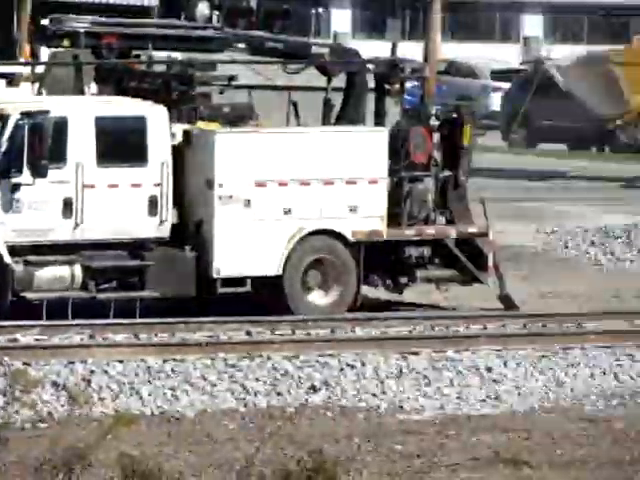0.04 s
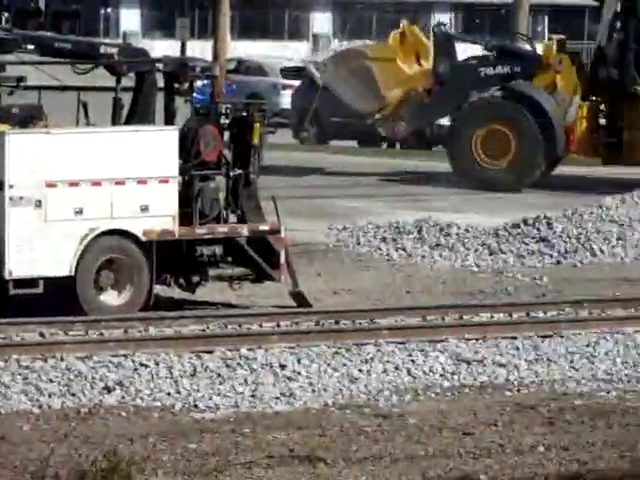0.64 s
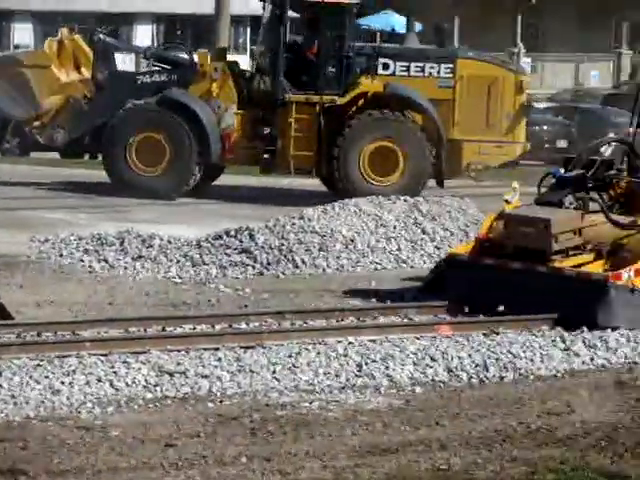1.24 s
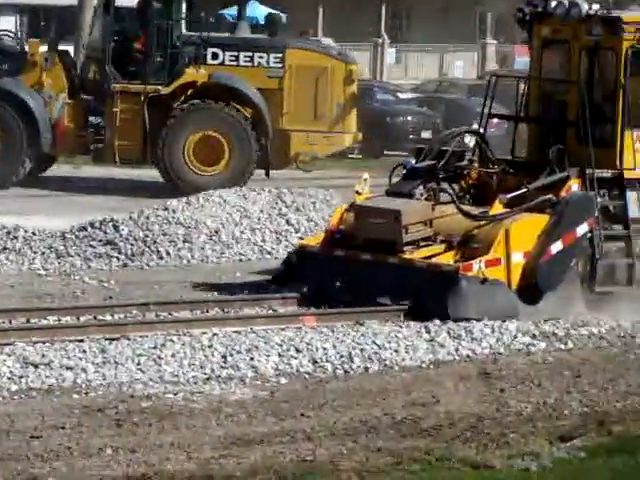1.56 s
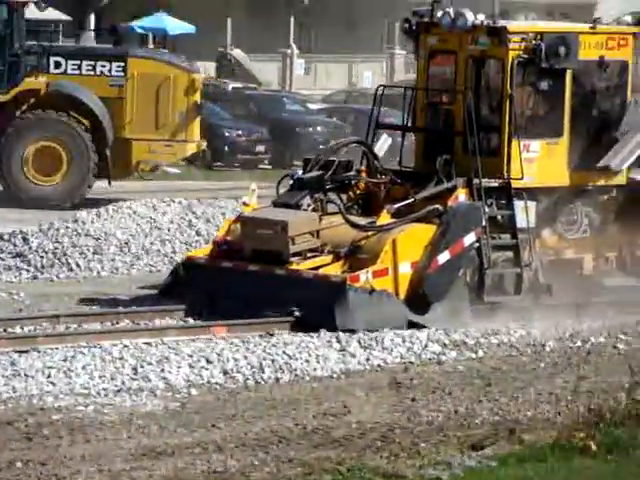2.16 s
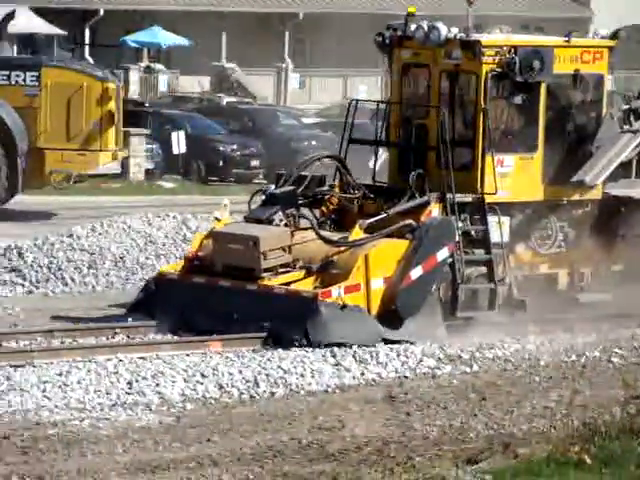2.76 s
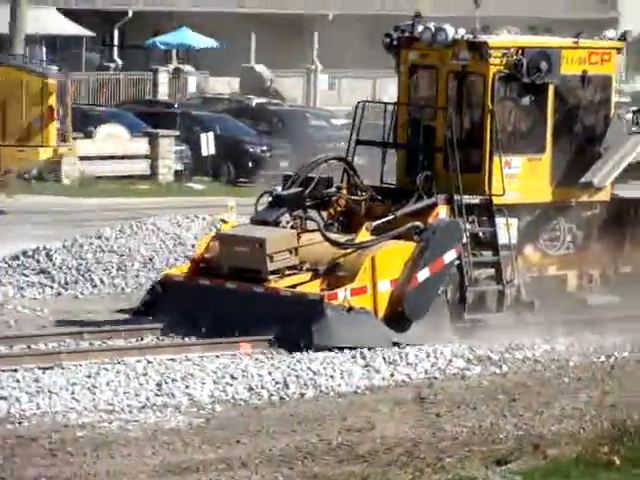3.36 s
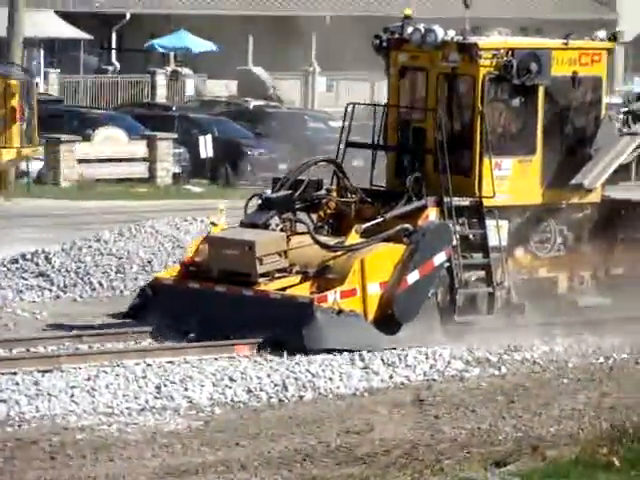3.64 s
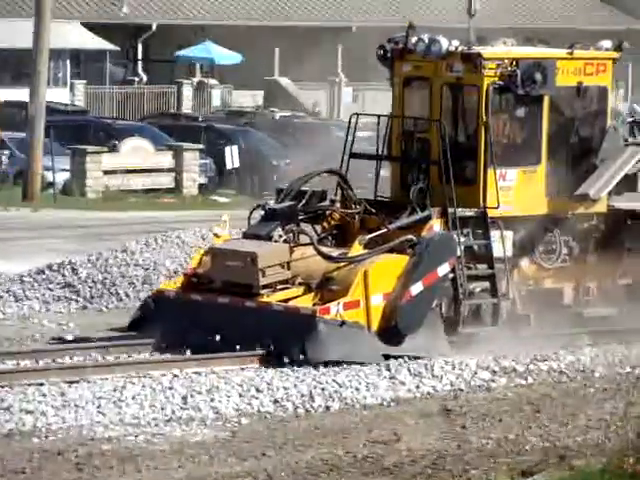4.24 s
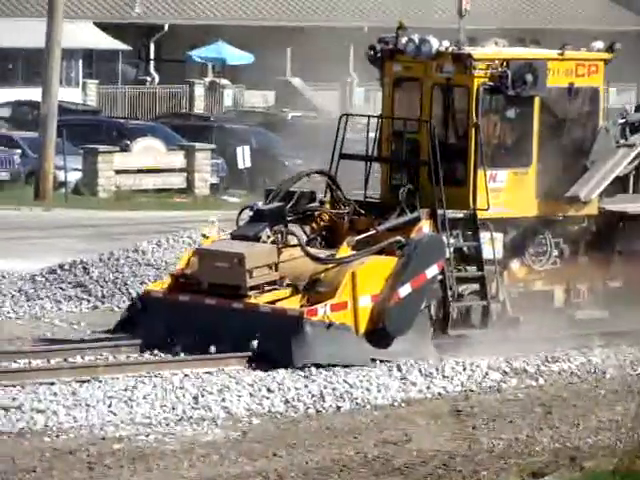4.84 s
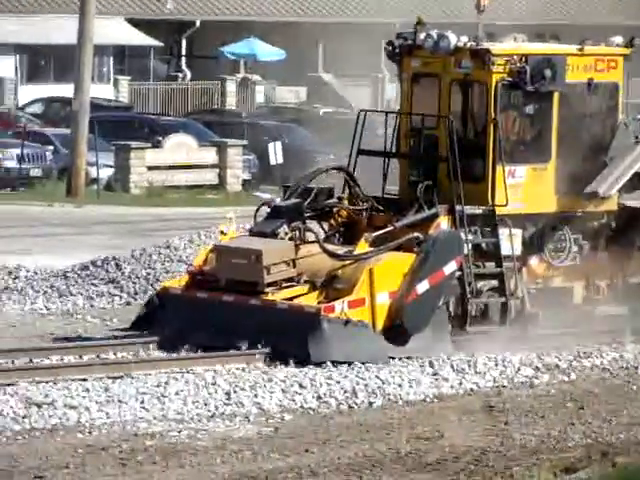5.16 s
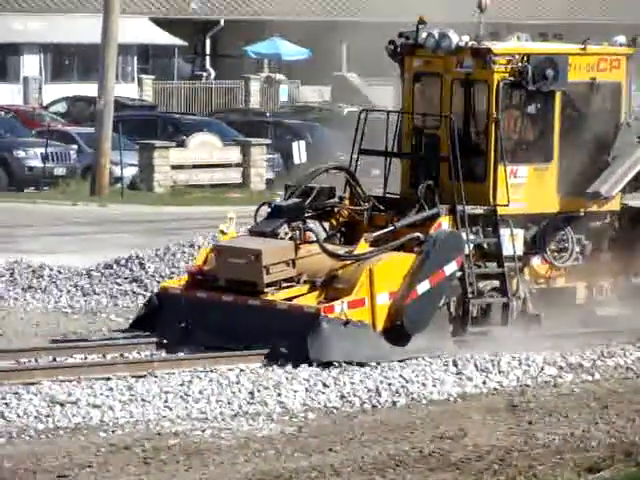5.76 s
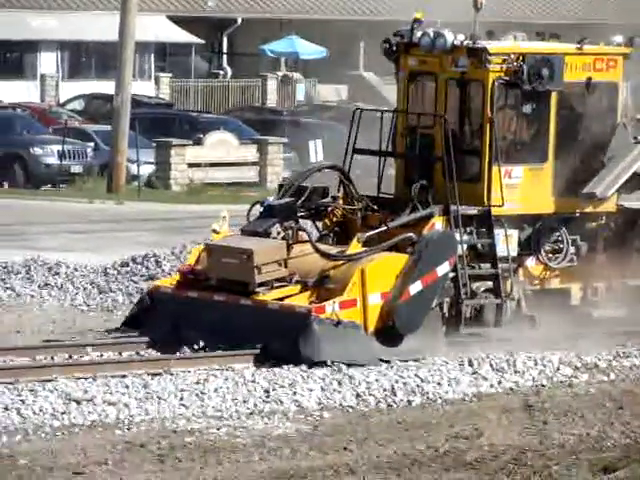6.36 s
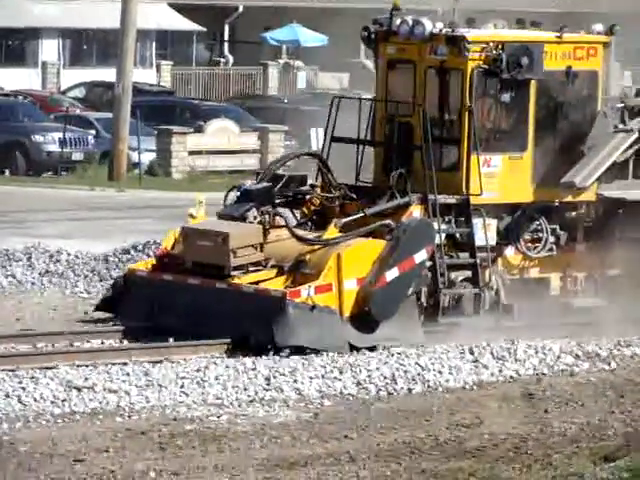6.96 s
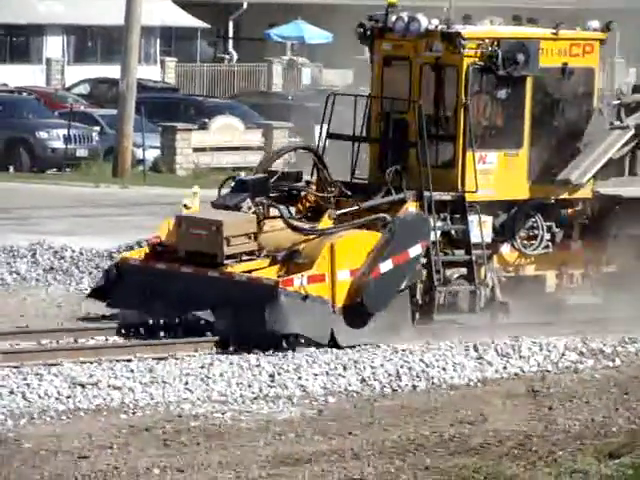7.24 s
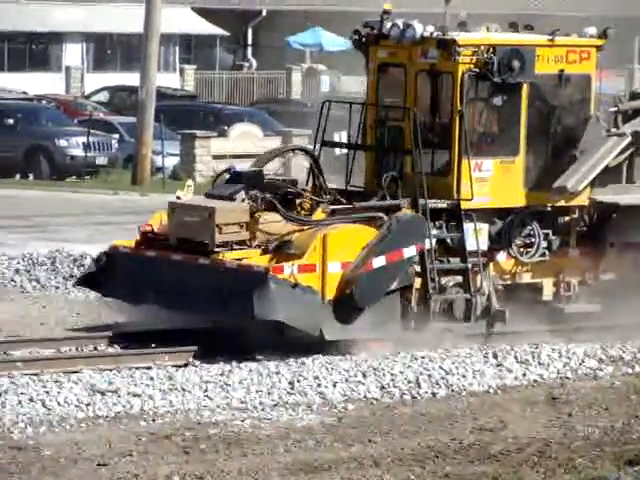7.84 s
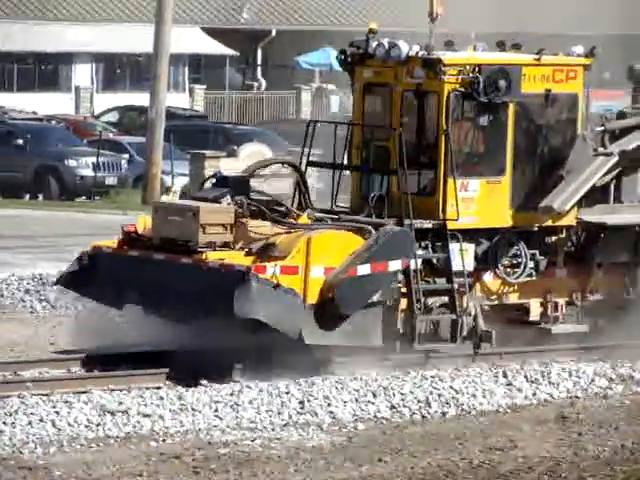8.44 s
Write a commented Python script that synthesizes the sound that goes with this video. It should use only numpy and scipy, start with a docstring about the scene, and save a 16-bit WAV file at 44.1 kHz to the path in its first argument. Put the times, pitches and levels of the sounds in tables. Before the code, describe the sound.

From the start, a railway machine's rotary broom throws crushed stone against a steel hood: a loud, dense, bright clatter with metallic ringing and spurts of hissing grit. Underneath drone two diesel engines, a cooling fan and a humming hydraulic pump, which sag briefly around 3.1 and 7.5 seconds. Single larger stones clack at irregular moments, and a faint, thin steel tone sings throughout the sweeping. Short, high squeals of rubbing steel come at about 0.5, 1, 2, 2.9 and 5.7 seconds, then overlap in a cluster from 6.6 to 7.5. Between 7.3 and 7.8 seconds the broom lifts and the clatter falls away to a faint remnant. The engine roar rises to fill its place until the end, at about 8.5 seconds. Everything is heard outdoors from the trackside on one microphone, with a short echo off machines and house fronts.

```python
"""Crushed stone clatters against a steel hood: a ballast regulator's rotary broom is sweeping the track.
Heard from the trackside on one camera microphone, with a short echo off machines and house fronts.
Steel squeals where it rubs. Underneath run the regulator's diesel, cooling fan and hydraulic pump,
and the diesel of a wheel loader nearby. Near the end the broom lifts, the stones fall away,
and the camera's gain control brings the engines up."""
import sys
import numpy as np
from scipy import signal
from scipy.fft import rfft, irfft, next_fast_len
from scipy.io import wavfile
from scipy.ndimage import uniform_filter1d, minimum_filter1d, map_coordinates

SR = 44100
rng = np.random.default_rng(int(sys.argv[2]) if len(sys.argv) > 2 else 0)


def to_wav(s):
    """Save 16-bit WAV."""
    ch = np.atleast_2d(s).T  # columns
    pcm = np.round(np.clip(ch, -1, 1) * 32767)  # PCM
    wavfile.write(sys.argv[1], SR, pcm.astype(np.int16))


N = 374850
TIME_S = np.arange(N) / SR

# the broom loses contact as it lifts off the ballast: time_s, gain_db
BROOM_LIFT = [(7.3, 0), (7.42, -3.5), (7.52, -13), (7.75, -28), (8.5, -22)]
# modes of the steel hood: pitch_hz, width_hz, level_db
HOOD_MODES = [(1231, 130, 0), (1504, 160, -0.5), (1707, 100, 2), (2107, 170, 0.5), (2783, 130, -1),
              (3150, 200, -0.5), (3730, 320, 1), (4560, 340, -6), (5610, 300, -7.5)]
# spectrum of stone striking stone: frequency_hz, level_db
STONE_SPECTRUM = [(200, -40), (450, -21.5), (700, -4.5), (1100, -1), (1600, -1.5), (1950, -3.5),
                  (2600, 1.5), (3300, -0.5), (4200, -3), (5100, -9), (6500, -13.5), (8000, -19),
                  (10000, -31)]
# the regulator's crankshaft: its free speed, and how far it races above that when relieved
REGULATOR_HZ, OVERSHOOT_HZ = 34.2, 0.9


def amp(db):
    """Decibels to gain."""
    return 10 ** (np.asarray(db) / 20)


def unit(x):
    """Scale to rms 1."""
    return x / np.sqrt(np.mean(x ** 2) + 1e-20)


def along(points, hz):
    """Read (frequency_hz, value) points at hz, on a log frequency axis."""
    point_hz, values = np.transpose(points)
    return np.interp(np.log(hz + 1), np.log(point_hz + 1), values)


def curves(rows):
    """One value per sample for each column after time_s."""
    time_s, *columns = np.transpose(rows)
    return [np.interp(TIME_S, time_s, column) for column in columns]


def bumps(rows):
    """A level in dB per sample: one smooth bump for each (centre_s, length_s, gain_db) row."""
    return sum(db * np.cos(np.pi * np.clip((TIME_S - centre_s) / length_s, -.5, .5)) ** 2
               for centre_s, length_s, db in rows)


def wobble(rate):
    """A smooth random curve, rate knots a second."""
    coarse = np.arange(0, N + 32, 32)
    knots = rng.standard_normal(int(N * rate / SR) + 4)
    return np.interp(np.arange(N), coarse, map_coordinates(knots, [coarse * rate / SR]))


def filtered(x, response):
    """Pass x through a gain that depends on frequency."""
    size = next_fast_len(N + SR // 2)
    return irfft(rfft(x, size) * response(np.fft.rfftfreq(size, 1 / SR)), size)[:N]


def coloured(x, spectrum):
    """Shape x with a (frequency_hz, level_db) spectrum, at rms 1."""
    return unit(filtered(x, lambda hz: amp(along(spectrum, hz))))


def phase_of(hz):
    """Running angle of a changing frequency."""
    return 2 * np.pi * np.cumsum(hz) / SR


def orders(angle, table):
    """Tones at multiples of a running angle, levels in dB rms."""
    return sum(np.sqrt(2) * amp(db) * np.sin(multiple * angle + rng.uniform(0, 2 * np.pi))
               for multiple, db in table)


def impacts(count, spread_db):
    """Randomly timed blows of random size, at rms 1."""
    push, size = rng.standard_normal((count, 2)).T
    return unit(np.bincount(rng.integers(N, size=count), np.sign(push) * amp(spread_db * size), N))


def yard_echo(x):
    """Scatter from machines and house fronts, changing as the broom travels; the treble dies first."""
    # decay time of the yard: frequency_hz, t60_s
    decay = [(200, 0.66), (2000, 0.13), (10000, 0.072)]
    out, hop = np.zeros(N + 2 * SR), SR // 4
    padded, fade = np.pad(x, (hop, 2 * hop)), np.hanning(2 * hop)
    for start in range(0, N + hop, hop):
        hz, t, noise = signal.stft(rng.standard_normal(SR // 3), SR, nperseg=256)
        tail = signal.istft(noise * amp(-60 * t / along(decay, hz)[:, None]), SR, nperseg=256)[1]
        echo = signal.fftconvolve(padded[start:start + 2 * hop] * fade, tail / np.linalg.norm(tail))
        out[start:start + len(echo)] += echo
    return out[hop:hop + N]


def cooling_fan(blade_hz=308.3):
    """The fan holds its speed; its blade tone wavers in the moving air."""
    # harmonics of the blade tone: multiple, level_db
    harmonics = [(1, -49), (2, -40)]
    return amp(2.2 * wobble(6)) * orders(phase_of(blade_hz * (1 + .006 * wobble(12))), harmonics)


def crank_change_hz(load_s=.25, relief_s=.29, settle_s=.6):
    """The regulator's crankshaft sags below its free speed under load and overshoots when relieved."""
    # moments of heaviest load: time_s, sag_hz
    strains = [(3.139, 3.2), (7.479, 3.05)]
    change = np.zeros(N)
    for time_s, sag_hz in strains:
        since_s = TIME_S - time_s
        relief = np.sin(np.pi / 2 * np.clip(since_s / relief_s, 0, 1)) ** 2
        change -= sag_hz * np.exp(np.minimum(since_s, 0) / load_s) * (1 - relief)
        change += OVERSHOOT_HZ * np.exp(-np.maximum(since_s - relief_s, 0) / settle_s) * relief
    return change


def diesels(loader_hz=31.27, roar_db=-24):
    """Two six-cylinder engines at nearly the same speed beat, under the roar of the engine bay."""
    # crankshaft orders of each engine: multiple, level_db
    regulator_orders = [(3, -47.5), (6, -47.5), (22, -51.5)]
    loader_orders = [(3, -44), (5, -59), (5.5, -53.5), (6, -46.5), (7, -51.5), (14, -54.5), (22.5, -42)]
    # noise of the engine bay and cooling fan: frequency_hz, level_db
    roar_spectrum = [(25, -23.5), (70, -18), (130, -9), (205, -5), (270, -6.5), (380, -10), (560, 0),
                     (760, 4), (1030, -6), (1300, -2), (2900, -3.5), (4200, -10), (6200, -17.5),
                     (10000, -28.5)]
    # the roar swells now and then: centre_s, length_s, gain_db
    swells = [(.08, 0.33, 3.5), (.47, 0.28, 4), (2.02, 0.34, 3.5), (4.58, 0.32, 3.5), (4.95, .25, 4.5),
              (6.75, 0.29, 1), (7.55, 0.22, 1.5), (7.94, 0.1, 1), (8.25, .2, 0)]
    regulator_crank = phase_of((REGULATOR_HZ + crank_change_hz()) * (1 + 0.00397 * wobble(4)))
    loader_crank = phase_of(loader_hz * (1 + 0.00199 * wobble(5)))
    regulator = amp(2.4 * wobble(6)) * orders(regulator_crank, regulator_orders)
    loader = amp(1.7 * wobble(5.6)) * orders(loader_crank, loader_orders)
    roar = coloured(rng.standard_normal(N), roar_spectrum)
    return regulator + loader + amp(roar_db + bumps(swells) + 0.6 * wobble(17)) * roar


def hydraulic_pump(free_hz=235.7, free_db=-38, db_per_sag_hz=1.0):
    """Geared to the crankshaft, the pump hums louder under load; its octave comes out when it races."""
    change_hz = crank_change_hz()
    angle = phase_of(free_hz * (1 + change_hz / REGULATOR_HZ) * (1 + .003 * wobble(15)))
    octave = amp(-9.5 + 5.5 * change_hz / OVERSHOOT_HZ + 2.7 * wobble(4)) * np.sin(2 * angle)
    level_db = free_db - db_per_sag_hz * change_hz + 1.5 * wobble(9)
    return np.sqrt(2) * amp(level_db) * (np.sin(angle) + octave)


def singing_steel(pitch_hz=1266):
    """One steel part sings faintly for as long as the broom is on the ballast."""
    lift_db, = curves(BROOM_LIFT)
    level_db = -35.5 + lift_db + 2.6 * wobble(4.6)
    return amp(level_db) * np.sin(phase_of(pitch_hz * (1 + .004 * wobble(40))))


def squeals():
    """Steel sings briefly where it rubs, with a slightly unsteady pitch."""
    # steel rubbing on steel: start_s, length_s, pitch_hz, level_db
    rubs = [(0.487, 0.12, 1657, -25.5), (0.98, 0.17, 2130, -27), (1.96, .07, 2015, -26.5),
            (2.162, 0.055, 2045, -25.5), (2.837, 0.29, 1255, -30), (2.886, 0.067, 2084, -25.5),
            (5.69, 0.069, 2130, -26), (6.6, .7, 2794, -29), (6.863, 0.067, 1660, -24.5),
            (6.959, 0.21, 1730, -28), (7.084, 0.4, 1259, -26), (7.122, 0.13, 2810, -25)]
    out = np.zeros(N)
    angle_per_hz = phase_of(1 + .0035 * wobble(90))
    grip = amp(1.2 * wobble(45))
    for start_s, length_s, pitch_hz, level_db in rubs:
        span = slice(int(start_s * SR), int((start_s + length_s) * SR))
        swell = np.sqrt(np.abs(np.sin(np.pi * (TIME_S[span] - start_s) / length_s)))
        out[span] += np.sqrt(2) * amp(level_db) * swell * np.sin(pitch_hz * angle_per_hz[span])
    return out * grip


def clacks(crack_t60_s=0.04, ring_t60_s=0.057):
    """Single large stones hit the hood, each with a crack and a brief ring."""
    # the hits: start_s, relative_db, pitch_hz
    hits = [(0.261, -4.5, 2740), (1.178, 1.5, 3320), (1.8855, -5, 1450), (2.606, 1.5, 2660),
            (2.671, -5, 3070), (3.631, 0.5, 2360), (4.2731, -1, 3600), (4.596, 0, 2760), (6.284, -4, 1134),
            (6.663, -3.5, 1700), (7.39, -8, 1274)]
    out, t = np.zeros(N + SR), np.arange(SR // 20) / SR
    for start_s, relative_db, pitch_hz in hits:
        crack = rng.standard_normal(len(t)) * amp(-60 * t / crack_t60_s)
        ring = np.sin(2 * np.pi * pitch_hz * t) * amp(-60 * t / ring_t60_s)
        out[round(start_s * SR):][:len(t)] += amp(relative_db - 7.5) * (crack + 0.66 * ring)
    return filtered(out[:N], lambda hz: amp(along(STONE_SPECTRUM, hz)))


def grit():
    """Fine chips spray out in their own short spurts."""
    # hiss of the chips: frequency_hz, level_db
    spectrum = [(2500, -28.5), (5500, 3.5), (10000, -9)]
    return amp(-26 + 5.0 * wobble(55)) * coloured(rng.standard_normal(N), spectrum)


def pings(count, typical_t60_s, spread_db, attack_s=0.00056):
    """Stones that bounce clear leave a hood panel ringing a little longer."""
    t = np.arange(SR // 12) / SR
    hz, width_hz, db = np.array(HOOD_MODES)[rng.integers(len(HOOD_MODES), size=count)].T[:, :, None]
    detune, life, size = rng.standard_normal((count, 3)).T[:, :, None]
    pitch_hz = hz + .5 * width_hz * detune
    fade_db = -60 * t / (typical_t60_s * np.exp(0.34 * life))
    envelope = amp(db + spread_db * np.tanh(size) + fade_db) * (1 - np.exp(-t / attack_s))
    rings = envelope * np.sin(2 * np.pi * pitch_hz * t)
    samples = rng.integers(N, size=(count, 1)) + np.arange(len(t))
    return unit(np.bincount(samples.ravel(), rings.ravel(), N)[:N])


def hood_panels():
    """Stones drum on the hood; each mode is struck at its own spots, so its strength wanders."""
    out = np.zeros(N)
    for hz, width_hz, db in HOOD_MODES:
        strength = amp(db + 0.94 * wobble(14))
        mode = signal.iirpeak(hz, hz / width_hz, SR)
        out += strength * signal.lfilter(*mode, impacts(count=16000, spread_db=2.5))
    return unit(signal.sosfilt(signal.butter(2, [900, 7000], "band", fs=SR, output="sos"), out))


def hood_ring():
    """The clatter's main ring, in which every blow dies in a millisecond or so."""
    # it sinks and weakens as the machine draws nearer: time_s, pitch_hz, relative_db
    approach = [(0, 3140, -4), (1.3, 3110, -6.5), (2.5, 3002, -8.5), (4, 2873, -8), (5.6, 2740, -9.5),
                (7.3, 2830, -12)]
    pitch_hz, relative_db = curves(approach)
    blows = impacts(count=20000, spread_db=6.0) + 1j * impacts(count=20000, spread_db=2)
    dying = signal.lfilter(*signal.butter(3, 320, fs=SR), blows)
    ring = unit(np.real(dying * np.exp(1j * phase_of(pitch_hz))))
    return amp(relative_db + 1.5 * wobble(20)) * ring


def handfuls_db(trickle_s=.008):
    """The level jumps as a handful of stones lands at once, and falls as it trickles away."""
    pole = np.exp(-1 / (trickle_s * SR))
    landing = signal.lfilter([1], [1, -pole], np.abs(impacts(count=1500, spread_db=2)))
    return .8 * unit(landing - landing.mean()) + .75 * wobble(55)


def stone_flow_db(turn_hz=2.59, slowing_hz_per_s=.038, first_dip_s=.375):
    """The flow follows the ballast's depth and dips once a turn, where the bristles are thin."""
    # hollows (-) and heaps (+) under the broom: centre_s, length_s, gain_db
    ballast = [(.38, .08, -1.5), (.57, 0.25, 1), (.72, 0.034, -5), (1.13, .11, -3), (2.27, 0.099, 2.5),
               (2.46, 0.024, -4.5), (2.55, 0.47, 0.5), (3.0, 0.13, 0), (3.1, 0.044, -2), (3.5, 0.11, 0.5),
               (3.87, .25, -0.5), (4.03, 0.058, -4.5), (4.34, 0.18, -3), (4.74, .1, 2.5), (4.83, .11, -2),
               (4.93, 0.066, -3), (4.99, .08, 0), (6.42, 0.44, -2.9), (6.85, 0.26, 1), (7.08, 0.067, -2),
               (7.16, .2, 1)]
    angle = phase_of(turn_hz - slowing_hz_per_s * TIME_S)
    thin_patch = np.cos((angle - np.interp(first_dip_s, TIME_S, angle)) / 2) ** 4
    return -16.5 - 0.5 * thin_patch + bumps(ballast) + .5 * wobble(18)


def broom():
    """Stones leave the bristles in uneven handfuls, hit each other and ring the hood."""
    lift_db, = curves(BROOM_LIFT)
    gravel = coloured(impacts(count=130000, spread_db=1.5), STONE_SPECTRUM)
    gravel *= amp(-3.5 + 1.13 * wobble(50))
    hood = amp(-5.5) * hood_panels() + hood_ring()
    hood += amp(-10) * pings(count=2400, typical_t60_s=.06, spread_db=3.5)
    return amp(stone_flow_db() + lift_db + handfuls_db()) * (gravel + hood + grit())


def scene():
    """At the microphone: stones with their echo and rubbing steel, over the machinery."""
    stones = broom() + clacks()
    echo = amp(-12) * yard_echo(stones)
    steel = squeals() + singing_steel()
    machinery = cooling_fan() + diesels() + hydraulic_pump()
    return (stones + echo + steel + machinery)[None]


def gain_control(x, target_db, hold_s, settle_s):
    """Gain follows the loudest recent moment towards a steady output level."""
    loudness = np.sqrt(np.abs(uniform_filter1d(x ** 2, SR // 10)))
    span = 2 * int(hold_s * SR / 2) + 1
    held = -minimum_filter1d(-loudness, span, origin=span // 2)
    wanted_db = target_db - 20 * np.log10(held + 1e-6)
    pole = np.exp(-1 / (settle_s * SR))
    return x * amp(signal.lfilter([1 - pole], [1, -pole], wanted_db))


def record(dry):
    """The camera levels the sound, rounds off the tallest peaks and cuts the highest treble."""
    ceiling, top_hz = .74, 10120
    levelled = gain_control(dry[0], target_db=-15.5, hold_s=0.1, settle_s=0.073)
    rounded = levelled / (1 + np.abs(levelled / ceiling) ** 8) ** (1 / 8)
    return filtered(rounded, lambda hz: hz < top_hz)[None]


dry = scene()
out = record(dry)
to_wav(out)
```